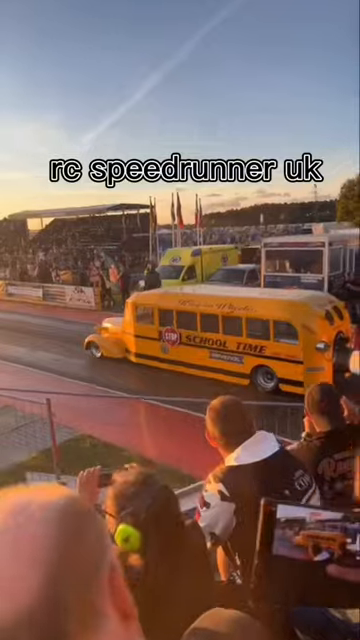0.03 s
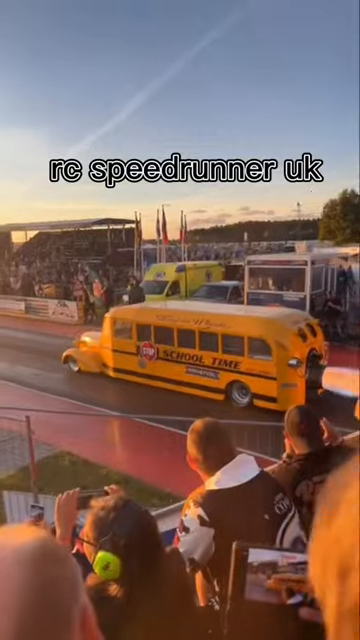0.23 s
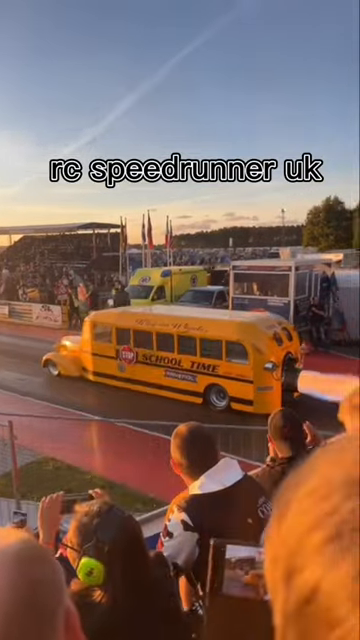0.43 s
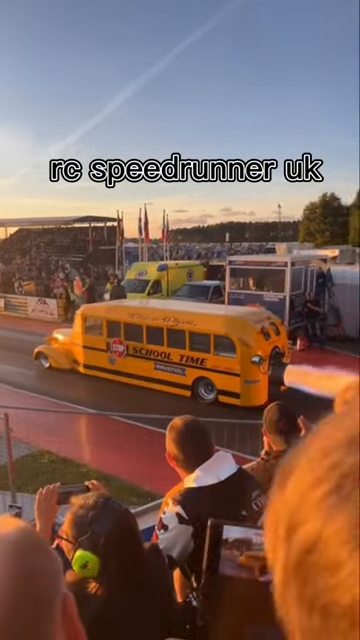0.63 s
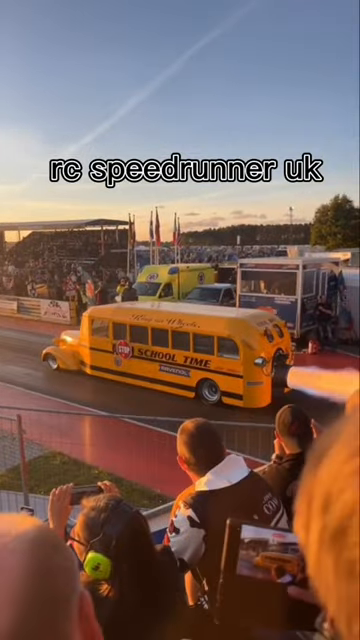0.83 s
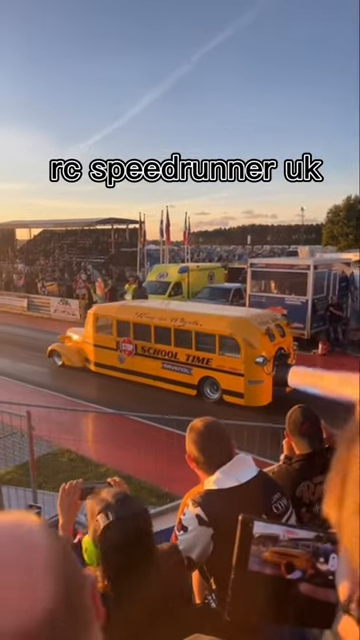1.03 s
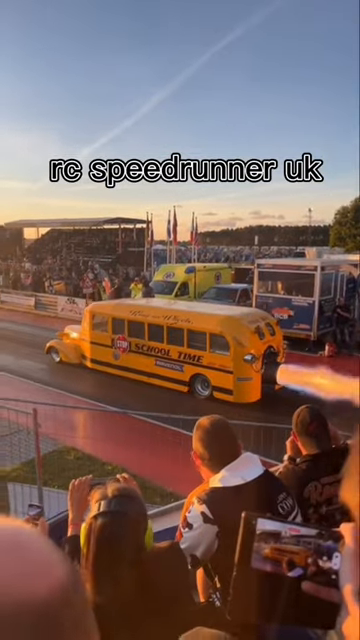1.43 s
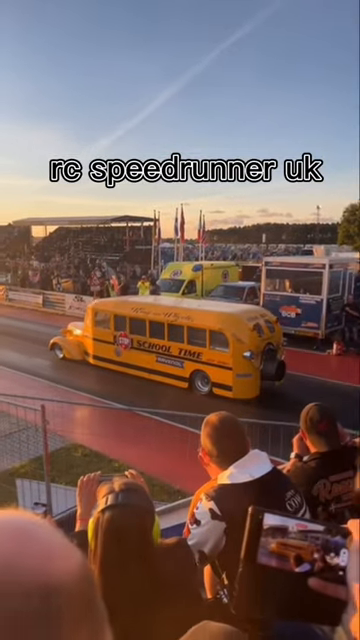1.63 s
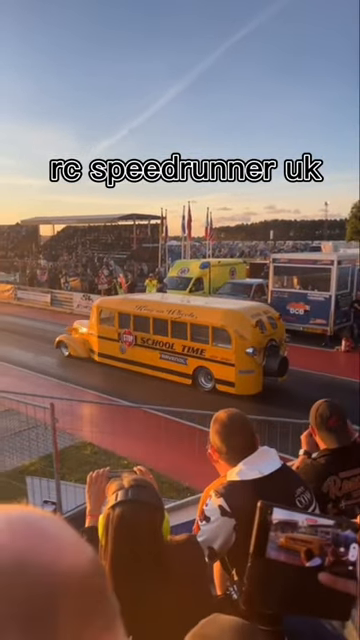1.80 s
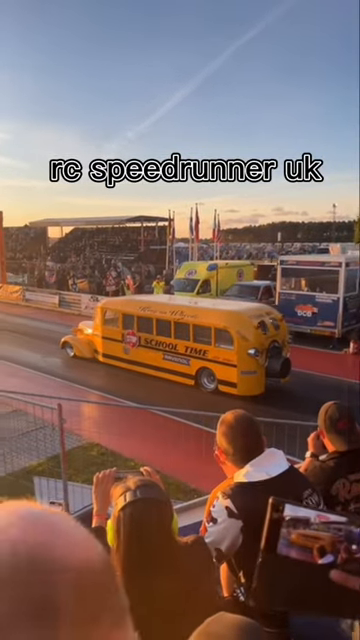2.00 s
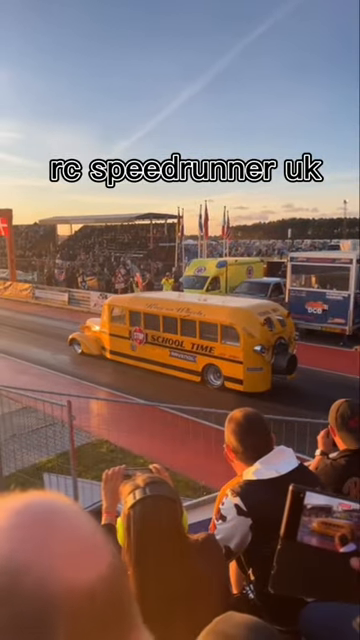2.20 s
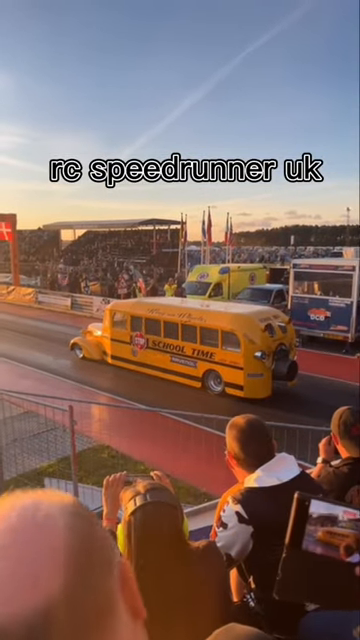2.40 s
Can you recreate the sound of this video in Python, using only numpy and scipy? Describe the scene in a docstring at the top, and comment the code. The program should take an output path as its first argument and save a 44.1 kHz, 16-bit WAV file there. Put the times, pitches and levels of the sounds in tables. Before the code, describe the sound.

A jet engine's loud afterburner roar cuts in with a click at about 0.2 seconds, a deep rumble with sputtering crackle on top, dipping briefly near 1.2 seconds. At about 1.6 seconds the roar dies away quickly, echoing briefly among the outdoor stands. A much quieter, steady rush and hiss remain, with a high turbine whine that rises slightly, until the end at about 2.5 seconds.

```python
"""The afterburner of a jet-powered bus roars on a drag strip, heard from the grandstand.
Turbulent combustion radiates a deep rumble and a sputtering upper roar, in which shocks crackle.
When the fuel is cut the roar dies away among the stands, leaving the rush of the exhaust, the hiss of
the intake and the blade tones of the turbine, which rise a little with shaft speed.
The sound cuts in with a click, and a limiter holds the peaks of the roar."""
import sys
import numpy as np
from scipy import signal
from scipy.fft import rfft, irfft, next_fast_len
from scipy.io import wavfile
from scipy.ndimage import uniform_filter1d, minimum_filter1d, map_coordinates

SR = 44100
rng = np.random.default_rng(int(sys.argv[2]) if len(sys.argv) > 2 else 0)


def bounce(signal):
    """Save signal as a 16-bit WAV file at the path given by the first command-line argument."""
    frames = np.transpose(np.atleast_2d(signal))
    limited = np.clip(frames, -1, 1)
    pcm = np.round(limited * 32767).astype(np.int16)
    wavfile.write(sys.argv[1], SR, pcm)


N = 112454

CUT_IN_S, FUEL_CUT_S = .2285, 1.578

# Likeness of the noise in the left and right channels: frequency_hz, coherence_ratio
STEREO_COHERENCE = [(4050, 1), (4300, 1), (4900, 0.62), (6000, 0.54), (8400, 0.48), (13000, 0.49)]
# Spectrum of the click: frequency_hz, relative_db
CLICK_SPECTRUM = [(40, -19), (150, -2), (320, 3.5), (650, -3.5), (1250, .5), (2000, -3.5), (2600, -13.5),
                  (4000, -8.5), (6000, -23.5), (9500, -33.5), (13000, -32)]
# Spectrum of the exhaust without its flame: frequency_hz, relative_db
EXHAUST_SPECTRUM = [(20, -30), (45, -11), (72, 4), (105, -3.5), (135, 0), (175, -7.5), (240, -4),
                    (290, -15.5), (430, -8), (520, -8.5), (770, -2.5), (950, -2), (1050, -1), (1300, -3),
                    (1440, -9), (1600, -2.5), (1830, -0.5), (2030, -13), (2600, -40)]
# Envelope of the exhaust: time_s, level_db
EXHAUST_LEVEL = [(.25, -34), (1.6, -34), (1.78, -32.5), (2.0, -34.5), (2.55, -35)]
# Spectrum of the intake air: frequency_hz, relative_db
INTAKE_SPECTRUM = [(1400, -42.5), (2050, -8), (2500, -5.5), (3200, -1.5), (3750, -1.5), (4500, -3),
                   (4850, -7), (5800, -9.5), (7000, -12.5), (8400, -16.5), (9600, -28.5), (11000, -32),
                   (12800, -27.5)]
# Envelope of the intake air: time_s, level_db
INTAKE_LEVEL = [(.25, -37), (.7, -36), (1.0, -37), (1.5, -38.5), (1.7, -35.5), (1.85, -35.5), (2.1, -35.5),
                (2.55, -36.5)]
# Turbine speed against its speed under the afterburner: time_s, speed_ratio
SHAFT_SPEED = [(.25, 1.002), (.9, 1.0), (1.62, .998), (1.72, 1.005), (1.85, 1.014), (2.05, 1.022),
               (2.3, 1.026), (2.55, 1.024)]
# Main blade tones, each with its envelope: pitch_hz, [(time_s, level_db), ...]
MAIN_BLADE_TONES = [ (1130, [(.4, -42.5), (.5, -37), (.66, -34), (.75, -50), (1.2, -48), (1.29, -33),
                    (1.5, -44.5), (1.61, -33), (1.7, -53)]), (2427, [(.25, -43), (.45, -38), (.73, -37.5),
                    (.88, -44.5), (1.25, -45), (1.7, -51.5), (2.55, -52)]), (3040, [(.25, -49.5),
                    (1.65, -58), (1.82, -45), (1.97, -47), (2.1, -51), (2.4, -55), (2.5, -43)]),
                    (4124, [(.25, -46.5), (.6, -40), (.9, -47), (1.22, -40.5), (1.31, -45), (1.4, -38),
                    (1.49, -36), (1.64, -47), (1.76, -36.3), (1.95, -46), (2.12, -42.5), (2.55, -46)]),
                    (4488, [(.25, -47), (.65, -52), (.8, -38.5), (1.0, -50), (1.24, -43.5), (1.5, -50),
                    (2.1, -46.5), (2.32, -40), (2.55, -51)]), ]
# Fainter blade tones: pitch_hz, level_db
FAINT_BLADE_TONES = [(1222, -47), (3400, -52), (4340, -56), (4850, -64), (6185, -60)]
# Envelope of the flame up to the fuel cut: time_s, level_db
FLAME_LEVEL = [(.25, -15.5), (.35, -14.5), (.8, -14.5), (1.0, -15), (1.12, -15), (1.18, -19.5),
               (1.26, -15.5), (1.41, -14.5), (1.52, -18)]
# Spectrum of the flame's rumble: frequency_hz, relative_db
RUMBLE_SPECTRUM = [(15, -31), (30, -21), (45, -14), (64, -1), (105, 0), (120, -0.5), (139, 2), (195, -11),
                   (233, -2.5), (265, -5), (300, -17), (350, -17.5), (414, -19), (500, -20.5), (700, -63)]
# Spectrum of the flame's upper roar: frequency_hz, relative_db
ROAR_SPECTRUM = [(300, -37), (500, -14), (545, -3.5), (590, 0), (660, -1.5), (770, -5.5), (850, -17.5),
                 (1020, -12), (1220, -15.5), (1420, -18.5), (1600, -16), (1840, -15), (2050, -28),
                 (2600, -26.5), (3200, -23.5), (4100, -22), (5000, -29.5), (8000, -37), (9700, -59),
                 (13000, -64)]
# Envelope of the upper roar against the rumble: time_s, relative_db
ROAR_LEVEL = [(.25, -8), (.36, -9.5), (.46, -7.5), (.53, -11.5), (.565, -6.5), (.61, -9.5), (.72, -7),
              (.9, -10.5), (1.15, -10), (1.3, -13), (1.57, -14.5)]


def amp(db):
    """Amplitude ratio of a level in decibels."""
    return 10 ** (np.asarray(db) / 20)


def unit_rms(x):
    """Normalisation to a mean power of 1."""
    return x / np.sqrt(np.mean(x ** 2) + 1e-20)


def clock():
    """Sample times in seconds."""
    return np.arange(N) / SR


def curve(rows):
    """Linear interpolation of (time_s, value) rows at every sample."""
    return np.interp(clock(), *np.transpose(rows))


def at_frequency(rows, hz):
    """Interpolation of (frequency_hz, value) rows on a logarithmic frequency axis."""
    row_hz, values = np.transpose(rows)
    return np.interp(np.log(hz + 1), np.log(row_hz + 1), values)


def wobble(knots_per_s):
    """Smooth random modulation: a spline through Gaussian knots."""
    return map_coordinates(rng.standard_normal(2048), [clock() * knots_per_s], mode="wrap")


def filtered(x, response):
    """Linear filtering: the spectrum of x is multiplied by a frequency response."""
    size = next_fast_len(N + SR // 2)
    return irfft(rfft(x, size) * response(np.fft.rfftfreq(size, 1 / SR)), size)[..., :N]


def minimum_phase(spectrum, hz):
    """Causal response with the gains of a spectrum table, obtained by folding the cepstrum."""
    gain = amp(at_frequency(spectrum, hz))
    cepstrum = irfft(np.log(np.maximum(gain, 1e-6)))
    half = len(cepstrum) // 2
    return np.exp(rfft(np.r_[cepstrum[0], 2 * cepstrum[1:half], np.zeros(half)]))


def coloured_stereo(pair, spectrum):
    """Partial coherence: two independent signals act as mid and side, the side only in the treble."""
    def response(hz):
        angle = np.arccos(np.clip(at_frequency(STEREO_COHERENCE, hz), -1, 1)) / 2
        return minimum_phase(spectrum, hz) * [np.cos(angle), np.sin(angle)]

    mid, side = filtered(pair, response)
    return unit_rms(np.array([mid + side, mid - side]))


def turbulence(spectrum, patchy_db):
    """Intermittency: turbulent noise varies in strength over patches of time and frequency."""
    cells = signal.stft(rng.standard_normal((2, N)), nperseg=512)[2]
    patches = uniform_filter1d(rng.standard_normal(cells.shape[1:]), size=4, axis=0)
    patches = uniform_filter1d(patches, size=16, axis=1)
    noise = signal.istft(cells * amp(patchy_db * unit_rms(patches)), nperseg=512)[1][:, :N]
    return coloured_stereo(noise, spectrum)


def click(lag_cycles=.5):
    """Dispersion: group delay is a fixed part of each period, so the low ring trails the treble."""
    def response(hz):
        return minimum_phase(CLICK_SPECTRUM, hz) * np.exp(-2j * np.pi * lag_cycles * np.log(hz + 1))

    impulse = np.arange(N) == round(CUT_IN_S * SR)
    crack = filtered(impulse, response)
    return amp(-6.5) * crack / np.abs(crack).max()


def airflow():
    """Aerodynamic noise: turbulent flow radiates a rush at the exhaust and a hiss at the intake."""
    rush = amp(curve(EXHAUST_LEVEL) + .3 * wobble(8.7)) * turbulence(EXHAUST_SPECTRUM, patchy_db=1.5)
    hiss = amp(curve(INTAKE_LEVEL) + .9 * wobble(34.97)) * turbulence(INTAKE_SPECTRUM, patchy_db=1.6)
    return rush + hiss


def turbine(waver_depth=.0005, fade_depth=.16):
    """Blade passage: pitch is proportional to shaft speed; moving air makes the tones waver and fade."""
    shaft_time = np.cumsum(curve(SHAFT_SPEED) * (1 + waver_depth * wobble(40))) / SR

    def tone(hz):
        fading = 1 + fade_depth * (wobble(22) + 1j * wobble(22))
        return unit_rms(np.real(fading * np.exp(2j * np.pi * hz * shaft_time)))

    main = sum(amp(curve(envelope)) * tone(hz) for hz, envelope in MAIN_BLADE_TONES)
    faint = sum(amp(db) * tone(hz) for hz, db in FAINT_BLADE_TONES)
    return main + faint


def crackle(shocks_per_s=800, spread_db=3):
    """Shot noise: shocks arrive as independent impulses of random strength."""
    arrivals = rng.random((2, N)) < shocks_per_s / SR
    strengths = amp(spread_db * np.clip(rng.standard_normal((2, N)), -2, 2))
    return coloured_stereo(arrivals * strengths, ROAR_SPECTRUM)


def flame_decay(flame_db_per_s=185, echo_db=-14, echo_db_per_s=59):
    """Exponential decay: after the fuel cut, reverberation among the stands outlasts the flame."""
    since_cut = np.maximum(clock() - FUEL_CUT_S, 0)
    return np.maximum(amp(-flame_db_per_s * since_cut), amp(echo_db - echo_db_per_s * since_cut))


def afterburner(shock_share=.46, sputter_db=1.74):
    """Combustion noise: a deep rumble, and a crackling upper roar modulated by unsteady burning."""
    rumble = turbulence(RUMBLE_SPECTRUM, patchy_db=.5)
    shocks = np.sqrt(shock_share) * crackle()  # incoherent sources add in power
    noise = np.sqrt(1 - shock_share) * turbulence(ROAR_SPECTRUM, patchy_db=1.5)
    roar = unit_rms((shocks + noise) * amp(sputter_db * wobble(70.42)))
    flame = amp(curve(FLAME_LEVEL)) * flame_decay()
    return flame * (rumble + amp(curve(ROAR_LEVEL)) * roar)


def scene():
    """Superposition: the pressures of flame, airflow and turbine add."""
    return afterburner() + airflow() + turbine()


def record(dry, open_s=.2405, rise_s=.006, muted_db=-21, ceiling_db=-7, hold_s=.016, top_hz=13200):
    """Gating and limiting: the sound opens just after the click; its peaks and bandwidth are limited."""
    opening = np.clip((clock() - open_s) / rise_s, 0, 1)
    gated = dry * (clock() > CUT_IN_S) * amp(muted_db * (1 - opening)) + click()
    needed_gain = np.minimum(1, amp(ceiling_db) / (np.abs(gated).max(axis=0) + 1e-9))
    hold = int(hold_s * SR)
    gain = uniform_filter1d(minimum_filter1d(needed_gain, hold), hold)
    return filtered(gated * gain, lambda hz: np.clip((top_hz - hz) / 150, 0, 1))


dry = scene()
out = record(dry)
bounce(out)
```